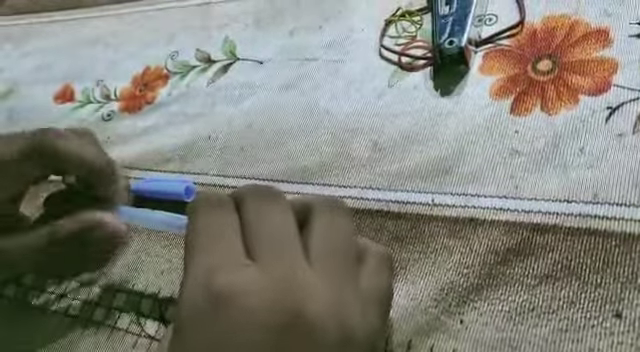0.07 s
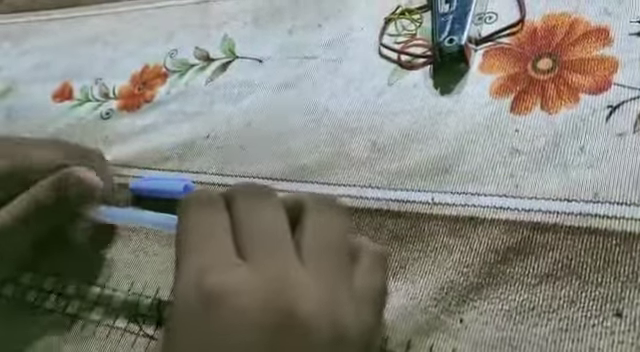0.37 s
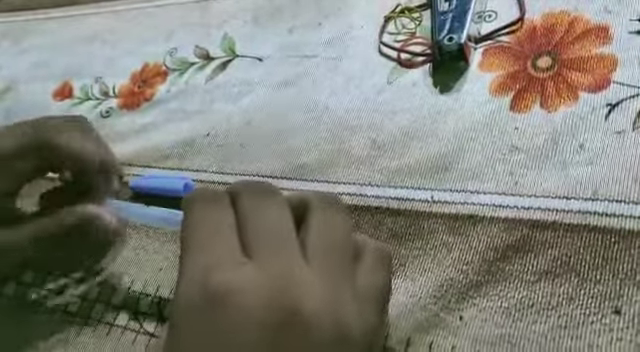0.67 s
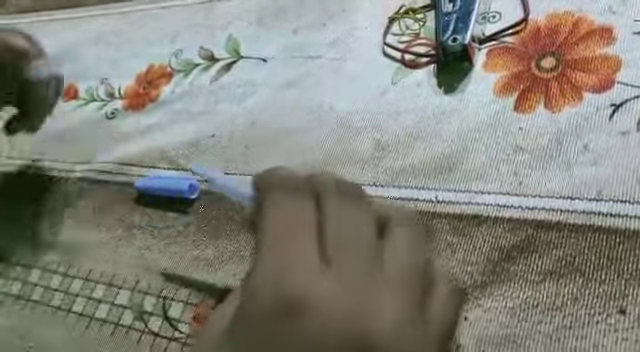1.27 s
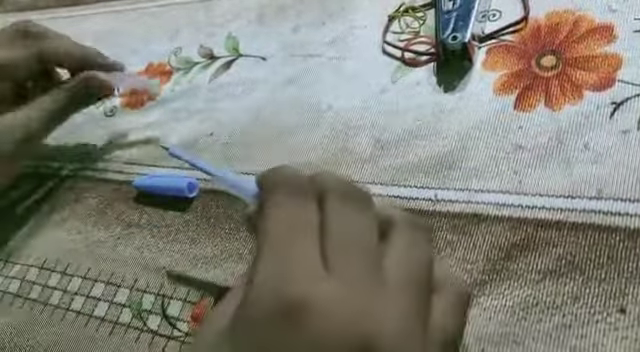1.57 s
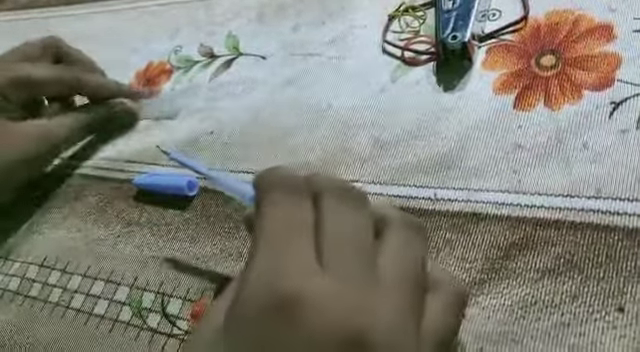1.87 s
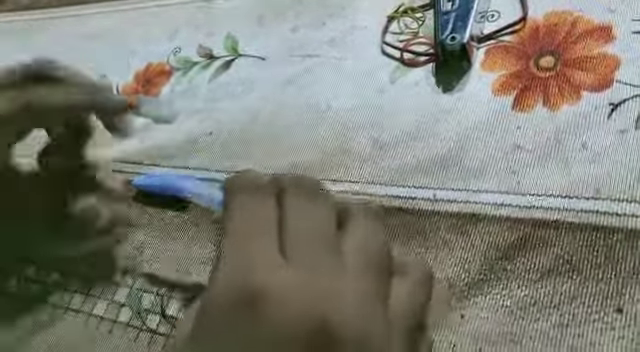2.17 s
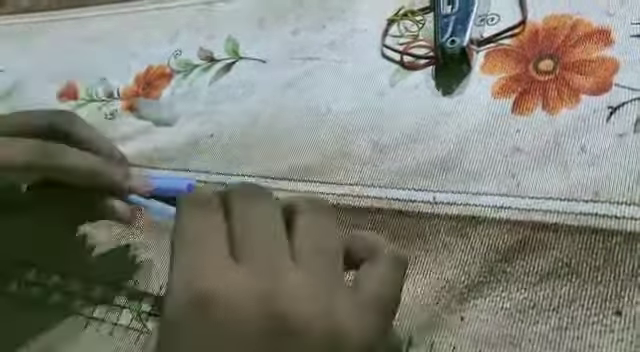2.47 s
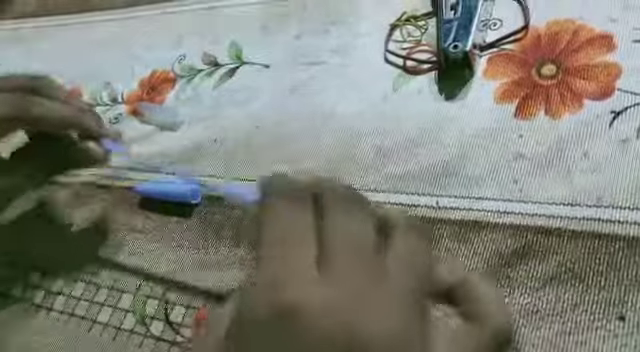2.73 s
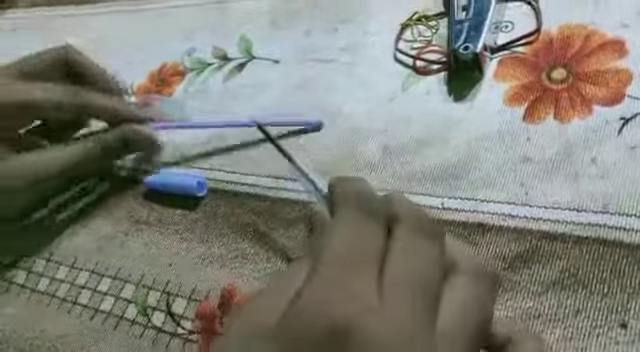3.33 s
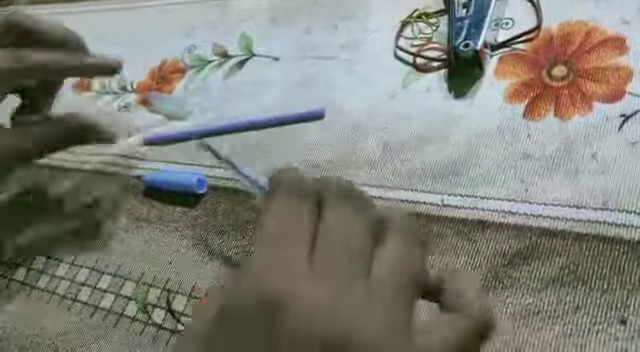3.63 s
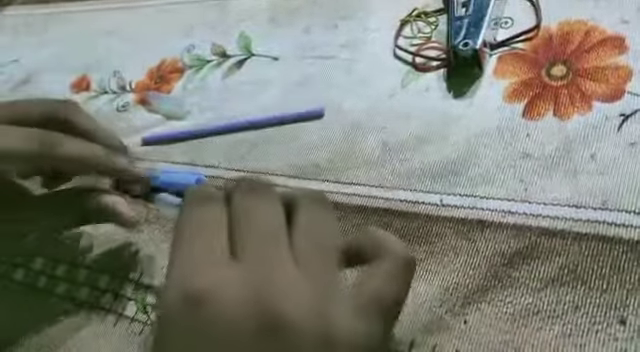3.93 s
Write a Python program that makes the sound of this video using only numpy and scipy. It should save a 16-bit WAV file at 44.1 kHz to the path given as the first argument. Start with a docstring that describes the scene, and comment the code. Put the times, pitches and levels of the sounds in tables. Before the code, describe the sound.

Soft, low knuckle thuds come in uneven clusters on padded cloth as a plastic pen is pulled apart, with light ticks and thin scrapes. Near the end the refill drags faintly, close to the microphone over dull room noise.

```python
"""A quiet room, a cloth-covered padded surface, a phone close by: two hands take a plastic pen apart.
Over dull room noise and a faint hiss, knuckles bump and shuffle on the padding and a hand brushes
the cloth. The pen's parts scrape and rasp by stick-slip friction, knock lightly and snap with ticks
that ring the barrel. Near the end the refill squeaks out, scuffs down and drags over the cloth."""
import sys
import numpy as np
from scipy import signal
from scipy.fft import rfft, irfft
from scipy.io import wavfile
from scipy.ndimage import uniform_filter1d

SR = 44100
rng = np.random.default_rng(int(sys.argv[2]) if len(sys.argv) > 2 else 0)


def unload_audio(sound):
    """Save the sound as a 16-bit wav file, at the path given as the first command line argument."""
    columns = np.transpose(np.atleast_2d(sound))
    # keep every value between -1 and 1, then stretch to whole-number steps
    steps = np.round(np.clip(columns, -1, 1) * 32767)
    wavfile.write(sys.argv[1], SR, steps.astype(np.int16))


N = 176400
T = np.arange(N) / SR
FREQ_HZ = np.arange(N // 2 + 1) * SR / N
TOP_HZ = 8000


def undb(db):
    """Decibels to gain."""
    return 10 ** (np.asarray(db) / 20)


def pan(pan_db):
    """Constant-power stereo gains; pan_db is left minus right."""
    gains = undb([[pan_db / 2], [-pan_db / 2]])
    return gains / np.sqrt(np.sum(gains ** 2))


def unit(x):
    """Scale to rms 1."""
    return x / np.sqrt(np.mean(x ** 2))


def noise():
    """White noise, independent per channel."""
    return rng.standard_normal((2, N))


def wander(rate_hz):
    """Smooth random drift, rms 1."""
    hold = max(int(SR / rate_hz), 2)
    steps = np.repeat(rng.standard_normal(N // hold + 1), hold)
    return unit(uniform_filter1d(steps, hold)[:N])


def filtered(x, gain):
    """Apply a gain per frequency bin; output rms 1."""
    return unit(irfft(rfft(x) * gain, N))


def colour(x, spectrum):
    """Shape by a spectrum interpolated over log frequency; output rms 1."""
    hz, db = np.array(spectrum).T
    return filtered(x, undb(np.interp(np.log(FREQ_HZ + 1), np.log(hz), db)))


def resonate(x, modes):
    """Pass through parallel resonances; output rms 1."""
    peaks = sum(undb(db) / (1 + (2 * (FREQ_HZ - hz) / width_hz) ** 2) for hz, width_hz, db in modes)
    return filtered(x, peaks)


def ripple(x, depth_db, width_hz):
    """Lay random narrow peaks and dips over the spectrum; output rms 1."""
    heights = rng.standard_normal(1024)
    ripple_db = depth_db * np.interp(FREQ_HZ / width_hz, np.arange(len(heights)), heights)
    return filtered(x, undb(ripple_db))


def flicker(x, depth_db, rate_hz, band_count):
    """Bands swell and fade independently at random; output rms 1."""
    spectrum = rfft(x)
    centres_hz, step_hz = np.linspace(0, TOP_HZ, band_count, retstep=True)
    bands = (irfft(spectrum * np.maximum(1 - abs(FREQ_HZ - hz) / step_hz, 0), N) for hz in centres_hz)
    return unit(sum(band * undb(depth_db * wander(rate_hz)) for band in bands))


def friction(snaps_per_s, rough):
    """Uneven stick-slip snaps over smooth hiss; rough is the snaps' share of the power."""
    snaps = (rng.random(N) < snaps_per_s / SR) * rng.exponential(1, N) * noise()
    return np.sqrt(rough) * unit(snaps) + np.sqrt(1 - rough) * noise()


def strokes(rows):
    """Stereo envelope: each stroke rises, holds, then drops 40 dB per fall_s."""
    envelope = 0
    for start_s, rise_s, hold_s, fall_s, level_db, pan_db in rows:
        rise = np.clip((T - start_s) / rise_s, 0, 1)
        fall = np.exp(-np.log(100) * np.maximum(T - start_s - rise_s - hold_s, 0) / fall_s)
        envelope = envelope + rise * fall * undb(level_db) * pan(pan_db)
    return envelope


def blows(rows, rise_s, glide):
    """Each contact swells one heavily damped resonance; its pitch sags as the pressure lets go."""
    out = np.zeros((2, N))
    for start_s, level_db, pitch_hz, pan_db in rows:
        i = int(start_s * SR)
        age = T[:min(SR // 10, N - i)] / rise_s
        sagging_hz = pitch_hz * (1 + glide * (2 * np.exp(-age / 2) - 1))
        tone = np.sin(2 * np.pi * np.cumsum(sagging_hz) / SR)
        swell = (age * np.exp(1 - age)) ** 2
        out[:, i:i + len(age)] += swell * tone * undb(level_db) * pan(pan_db)
    return out


# Room noise common to both microphones, and separate at each: freq_hz, gain_db
ROOM_COMMON_SPECTRUM = [(25, -34), (60, -19), (110, -4), (190, 0), (290, -3.5), (390, -11), (490, -12),
                        (650, -19), (930, -15), (1080, -30), (1250, -55), (1600, -62.5), (8000, -74.5)]
ROOM_SEPARATE_SPECTRUM = [(25, -16.5), (50, -5.5), (100, 5), (170, -2), (280, -8.5), (380, -12.5),
                          (500, -5), (700, -8.5), (950, -18), (1100, -24.5), (1280, -43.5), (1800, -46),
                          (2800, -55), (5500, -57), (6800, -40), (8000, -57)]

def room(left_lag_s=0.00016, waver_db=0.77):
    """Dull air noise, wavering slightly; the common part reaches the left microphone later."""
    air = undb(-51.5) * colour(rng.standard_normal(N), ROOM_COMMON_SPECTRUM)
    common = np.array([np.interp(T - left_lag_s, T, air), air])
    separate = undb(-56) * colour(noise(), ROOM_SEPARATE_SPECTRUM)
    return (common + separate) * pan(1.5) * undb(waver_db * wander(rate_hz=12))


# Faint hiss: freq_hz, gain_db
HISS_SPECTRUM = [(1000, -8.5), (1400, 0.5), (1900, -2), (2500, -8), (3500, -10.5), (4500, -15.5),
                 (6000, -12.5), (8000, -20)]

def faint_flickering_hiss():
    """A very faint, constant hiss whose bands swell and fade at random."""
    hiss = colour(noise(), HISS_SPECTRUM)
    return flicker(hiss, depth_db=8, rate_hz=28, band_count=30) * undb(-88.5) * pan(4.5)


# Hand over cloth: start_s, rise_s, hold_s, fall_s, level_db, pan_db
BRUSH_STROKES = [(.412, 0.023, 0.033, 0.11, -61, 8.5), (.457, 0.04, 0.037, 0.23, -51, 5.5)]
# Skin on the weave: freq_hz, gain_db
BRUSH_SPECTRUM = [(1250, -62), (1480, -23), (1700, -7), (2400, -5), (2840, -2), (3500, -6.5), (4500, -5),
                  (5500, -3), (6600, 5.5), (7300, 1), (8000, -18)]

def hand_brushes(light_cutoff_hz=2350, full_pressure_at_s=0.475, press_s=0.0081):
    """Skin brushes the weave: thin at first, fuller once the hand bears down."""
    weave = colour(friction(snaps_per_s=13000, rough=0.089), BRUSH_SPECTRUM)
    full = ripple(weave, depth_db=1.5, width_hz=45)
    thin = signal.sosfilt(signal.butter(8, light_cutoff_hz, "high", fs=SR, output="sos"), full)
    pressure = np.clip((T - full_pressure_at_s) / press_s + 1, 0, 1)
    return strokes(BRUSH_STROKES) * (pressure * full + (1 - pressure) * thin)


# Weight shifts: start_s, rise_s, hold_s, fall_s, level_db, pan_db
SHUFFLE_STROKES = [(0, 0.0068, 0.051, 0.58, -37.5, 6.5), (.66, 0.02, 0.12, 0.19, -43.5, 20.5),
                   (1.03, 0.034, 0.11, 0.11, -36, 8.5), (1.86, 0.027, 0.079, 0.5, -46, 17),
                   (2.58, 0.048, 0.043, 0.28, -46.5, 9), (2.75, 0.016, 0.08, 0.16, -41, 20),
                   (3.18, 0.073, 0.11, 0.32, -52, 3), (3.7, 0.042, 0.074, 0.2, -61.5, -7.5)]
# Friction through the padding: freq_hz, gain_db
SHUFFLE_SPECTRUM = [(25, -14.5), (50, -17), (80, -1), (120, 4.5), (180, -6), (280, -11.5), (450, -29.5),
                    (1000, -40.5), (1400, -76)]

def hand_shuffles():
    """Hands shift their weight: low friction through the padded surface."""
    return strokes(SHUFFLE_STROKES) * colour(friction(snaps_per_s=170, rough=0.29), SHUFFLE_SPECTRUM)


# Knuckles on the padding: start_s, level_db, pitch_hz, pan_db
KNUCKLE_HITS = [(.018, -31, 177, 18), (.039, -28.5, 170, 19), (.117, -27, 131, 15),
                (.216, -30.5, 122.4, -24), (.238, -35, 120, 12), (.256, -33, 144, -24),
                (.657, -27.5, 126, 31), (.688, -31.5, 141, 22), (.784, -32.5, 124, 33),
                (1.036, -28.5, 84.4, 30), (1.070, -35, 140, 20), (1.085, -27.5, 111, 30.5),
                (1.118, -42, 135, -23), (1.137, -30.5, 134, 18), (1.162, -34.5, 176, 8),
                (1.737, -32.5, 120, 19), (1.879, -32, 130, 17.5), (1.911, -32.5, 153, 20.5),
                (1.929, -35.5, 168, 14.5), (1.976, -40.5, 130, 12), (2.497, -35, 140, 19),
                (2.523, -30.5, 119, 33), (2.726, -38.5, 121, -14), (2.749, -24, 143.6, 28.5),
                (2.763, -27, 167, 24), (2.808, -31.5, 120, 28), (2.834, -27.5, 121.6, 21),
                (3.298, -38, 112, 23), (3.453, -42, 230, 9), (3.744, -38.5, 132, -33)]

def knuckle_bumps():
    """Knuckles land on the padded surface with soft, low thuds."""
    return blows(KNUCKLE_HITS, rise_s=0.0051, glide=0.09)


# Lightest finger contacts: start_s, rise_s, hold_s, fall_s, level_db, pan_db
TOUCH_STROKES = [(.31, .023, 0.027, .093, -83.5, 8.8), (.92, .01, 0.038, .08, -83.5, 15),
                 (1.31, 0.013, 0.018, .13, -81, 8.2), (1.43, .014, 0.018, .09, -81, 14),
                 (1.57, 0.012, 0.026, .09, -81, 12), (1.7, 0.011, 0.033, .09, -83, 16),
                 (1.945, 0.0068, 0.037, .1, -79.5, 18.8), (2.07, 0.012, 0.04, .09, -81, 13),
                 (2.585, 0.0095, .02, .09, -87, 10), (3.21, 0.016, .042, .14, -79.5, 19)]
# Their resonances: freq_hz, width_hz, gain_db
TOUCH_RESONANCES = [(6680, 130, -1.5), (7200, 170, -1.5)]

def finger_touches():
    """Light friction on the pen: a thin, high whisper."""
    return strokes(TOUCH_STROKES) * resonate(friction(snaps_per_s=400, rough=0.4), TOUCH_RESONANCES)


# Fingertips on the barrel: start_s, rise_s, hold_s, fall_s, level_db, pan_db
SLIP_STROKES = [(-.02, 0.021, 0.072, 0.15, -79.5, 38), (.81, 0.025, 0.014, 0.13, -75, 7.5),
                (1.2, 0.012, 0.036, .12, -81.5, 16), (1.815, 0.0061, 0.046, 0.2, -76.5, 18),
                (2.145, 0.03, 0.051, 0.28, -74.5, 21), (2.41, 0.035, 0.083, 0.23, -74.5, 12),
                (2.68, 0.089, 0.011, 0.079, -76.5, 2.6), (3.12, 0.022, 0.02, 0.19, -76.5, 24)]
# Slip hiss: freq_hz, gain_db
SLIP_SPECTRUM = [(1500, -23), (3500, -15), (5300, -30), (6000, -1), (6600, 5.5), (7200, 4), (7700, -18),
                 (8200, -30)]

def finger_slips(pings_per_s=410, low_hz=5860, high_hz=7300, rise_s=0.002, t60_s=0.05, ping_share=0.45):
    """Skin ridges catch on the barrel: tiny high pings over thin hiss."""
    t = T[:SR // 20]
    pings = np.zeros((2, N + len(t)))
    envelope = np.exp(-np.log(1000) * t / t60_s) * (1 - np.exp(-t / rise_s))
    for when, pitch, size, right_phase in rng.random((int(pings_per_s * N / SR), 4)):
        i = int(when * N)
        pitch_hz = low_hz + pitch * (high_hz - low_hz)
        cycles = pitch_hz * t + np.array([[0], [right_phase]])
        pings[:, i:i + len(t)] += size * envelope * np.sin(2 * np.pi * cycles)
    hiss = colour(noise(), SLIP_SPECTRUM)
    slip = np.sqrt(ping_share) * unit(pings[:, :N]) + np.sqrt(1 - ping_share) * hiss
    return strokes(SLIP_STROKES) * slip


# Refill sliding: start_s, rise_s, hold_s, fall_s, level_db, pan_db
SQUEAK_STROKES = [(3.32, 0.025, 0.074, 0.27, -67, 11)]
# Squeak resonances: freq_hz, width_hz, gain_db
SQUEAK_RESONANCES = [(5940, 77, -1), (6520, 100, 3), (6980, 79, 3)]

def refill_squeak():
    """The sliding refill excites narrow, high resonances."""
    return strokes(SQUEAK_STROKES) * resonate(noise(), SQUEAK_RESONANCES)


# Refill landing: start_s, rise_s, hold_s, fall_s, level_db, pan_db
SCUFF_STROKES = [(3.445, 0.015, 0.048, 0.081, -50, 0.0048)]
# Landing friction: freq_hz, gain_db
SCUFF_SPECTRUM = [(150, 4), (300, 4.5), (600, -4), (950, -5.5), (1300, -20), (1900, -30.5), (2400, -42),
                  (4000, -55)]

def refill_scuff():
    """The refill comes down on the cloth with a dull burst of friction."""
    return strokes(SCUFF_STROKES) * colour(friction(snaps_per_s=730, rough=0.1), SCUFF_SPECTRUM)


# Refill over cloth: time_s, level_db
DRAG_ENVELOPE = [(3.42, -100), (3.48, -75), (3.52, -64), (3.619, -67), (3.69, -67.5), (3.76, -65),
                 (3.83, -70), (3.9, -73.5), (4.0, -78)]
# Drag hiss: freq_hz, gain_db
DRAG_SPECTRUM = [(1200, -8.5), (1450, -16), (1750, -17), (2300, -25), (2900, -26), (3250, -11), (3750, -7),
                 (4250, -5.5), (4700, -6), (5300, -1.5), (6200, 0), (6800, -5), (7500, -13), (8000, -41)]
# Refill resonances: freq_hz, width_hz, gain_db
REFILL_RESONANCES = [(1740, 130, -12.5), (4266, 140, -4), (5270, 220, -9), (6090, 220, 1)]

def refill_drag(ring_db=-3.5):
    """The refill hisses and rings over the cloth, flickering as the contact shifts."""
    time_s, level_db = np.array(DRAG_ENVELOPE).T
    envelope = undb(np.interp(T, time_s, level_db)) * (T > time_s[0])
    hiss = colour(friction(snaps_per_s=3400, rough=0.28), DRAG_SPECTRUM)
    hiss = ripple(hiss, depth_db=4.5, width_hz=59)
    ring = undb(ring_db) * resonate(friction(snaps_per_s=2300, rough=0.24), REFILL_RESONANCES)
    return envelope * flicker(hiss + ring, depth_db=2.5, rate_hz=22, band_count=24) * pan(10)


# Parts twisting: start_s, rise_s, hold_s, fall_s, level_db, pan_db
TWIST_STROKES = [(0, 0.0068, 0.049, 0.16, -83.5, 6.2), (1.061, 0.0027, 0.04, 0.13, -67.5, 4.2)]
# Hollow barrel: freq_hz, width_hz, gain_db
BARREL_RESONANCES = [(1500, 360, -.5), (2050, 280, 0.5), (2750, 300, -10), (3550, 300, -6),
                     (3940, 160, -10.5), (5120, 170, -7), (5800, 200, -8), (6470, 110, -4), (7400, 260, -5)]

def pen_twists():
    """Parts twist against each other and rasp through the hollow barrel."""
    return strokes(TWIST_STROKES) * resonate(friction(snaps_per_s=2200, rough=0.25), BARREL_RESONANCES)


# Parts pulled out: start_s, rise_s, hold_s, fall_s, level_db, pan_db
SCRAPE_STROKES = [(.02, 0.05, 0.013, 0.15, -74.5, 11), (1.075, 0.025, 0.03, 0.27, -66.5, 9.3),
                  (2.745, 0.026, 0.067, 0.28, -64, 3.6)]
# Plastic on plastic: freq_hz, gain_db
SCRAPE_SPECTRUM = [(1300, -30.5), (2200, -19.5), (3500, -17), (4600, -20.5), (5700, -6.5), (6600, 1.5),
                   (7400, -5), (8000, -18.5)]

def pen_scrapes():
    """Plastic slides on plastic; the grip shifts the barrel's narrow resonances at each stroke."""
    scrape = colour(friction(snaps_per_s=1100, rough=0.24), SCRAPE_SPECTRUM)
    return sum(strokes([row]) * ripple(scrape, depth_db=2, width_hz=160) for row in SCRAPE_STROKES)


# Parts knocking: start_s, level_db, pitch_hz, pan_db
PART_HITS = [(.677, -47.5, 806, 2), (1.472, -47.5, 560, 4), (1.876, -53.5, 535, 2), (1.981, -49.5, 508, 1),
             (2.486, -52, 820, -4), (2.775, -49, 573, 0), (3.455, -43.5, 530, -5), (3.490, -48, 570, -1)]

def pen_knocks():
    """Pen parts knock lightly, each hit one damped midrange resonance."""
    return blows(PART_HITS, rise_s=0.0026, glide=0.04)


# Plastic snaps: start_s, level_db, pan_db, pitch_ratio
TICK_HITS = [(0.0574, -57.5, 17.5, .97), (1.098, -53, -0.5, 1.05), (1.112, -52.5, 2.5, 1.17),
             (1.124, -69, 17, 0.79), (1.1394, -52.5, 17, 1), (2.781, -51.5, 8, 1.06),
             (2.8431, -44, 18, 0.98), (2.854, -64, 4, 1.2), (2.865, -54, 19, 0.99), (2.878, -63, 12, 0.96)]
# Finger-damped barrel: base_hz, gain_db, t60_s
BARREL_TICK_MODES = [(2800, -20, 0.0072), (3640, -13, .005), (5100, -15, 0.015), (6040, -2, 0.0096),
                     (6800, -4, 0.0059), (7100, -14, 0.0083)]

def pen_ticks(rise_s=0.00055, detune=0.022):
    """The barrel, damped by the fingers, rings for a few milliseconds at each snap."""
    out, t = np.zeros((2, N)), T[:SR // 20]
    attack = 1 - np.exp(-(t / rise_s) ** 2)
    for start_s, level_db, pan_db, pitch_ratio in TICK_HITS:
        ratios = pitch_ratio * (1 + detune * rng.standard_normal(len(BARREL_TICK_MODES)))
        ring = np.zeros(len(t))
        for (base_hz, gain_db, t60_s), ratio in zip(BARREL_TICK_MODES, ratios):
            decay = np.exp(-np.log(1000) * t / t60_s)
            ring += undb(gain_db) * attack * decay * np.sin(2 * np.pi * base_hz * ratio * t)
        i = int(start_s * SR)
        out[:, i:i + len(t)] += ring / np.abs(ring).max() * undb(level_db) * pan(pan_db)
    return out


def scene():
    """Hands, refill and pen over room noise and faint hiss."""
    background = room() + faint_flickering_hiss()
    hands = hand_brushes() + hand_shuffles() + knuckle_bumps() + finger_touches() + finger_slips()
    refill = refill_squeak() + refill_scuff() + refill_drag()
    pen = pen_twists() + pen_scrapes() + pen_knocks() + pen_ticks()
    return background + hands + refill + pen


def record(dry):
    """The phone cuts the treble above TOP_HZ."""
    return signal.sosfilt(signal.ellip(10, 0.2, 80, TOP_HZ, fs=SR, output="sos"), dry)


dry = scene()
out = record(dry)
unload_audio(out)
```